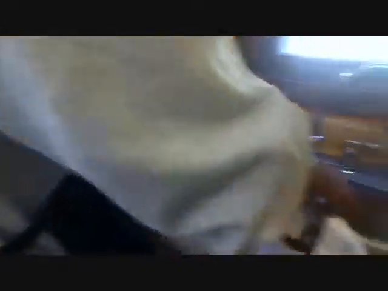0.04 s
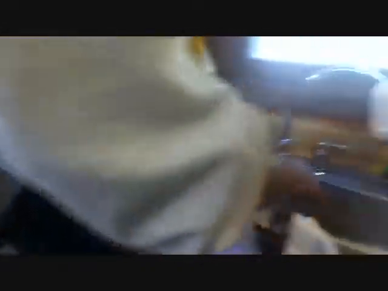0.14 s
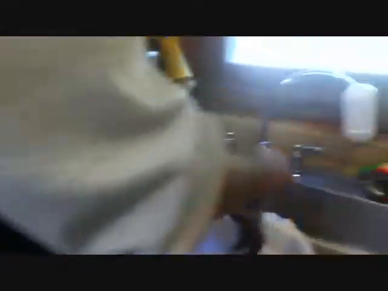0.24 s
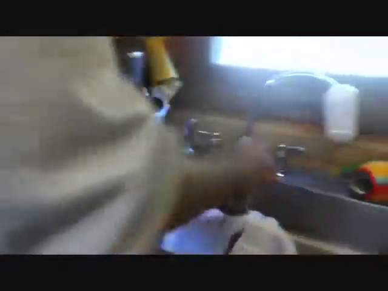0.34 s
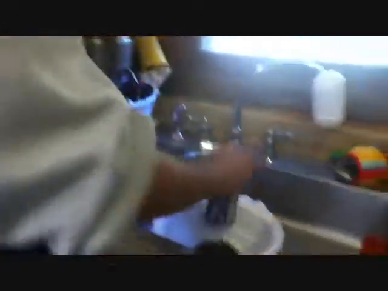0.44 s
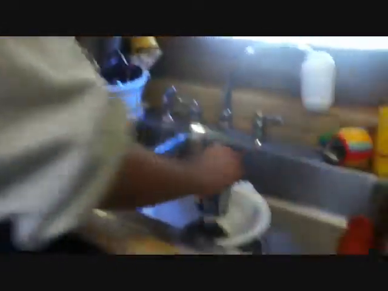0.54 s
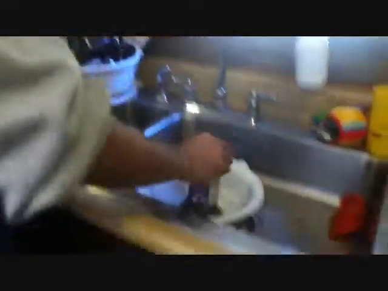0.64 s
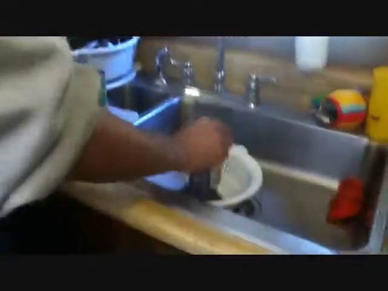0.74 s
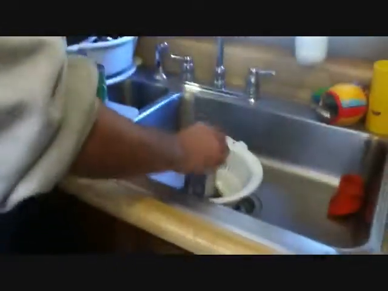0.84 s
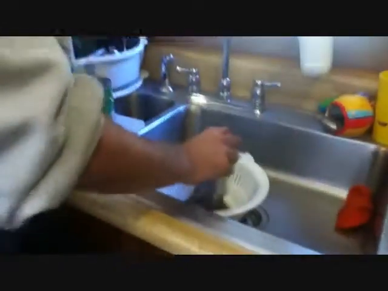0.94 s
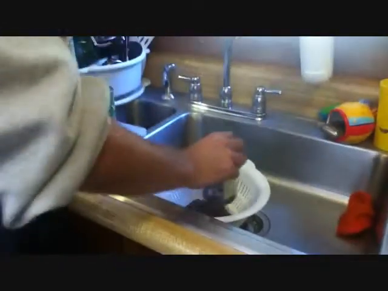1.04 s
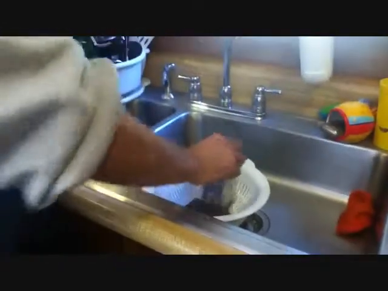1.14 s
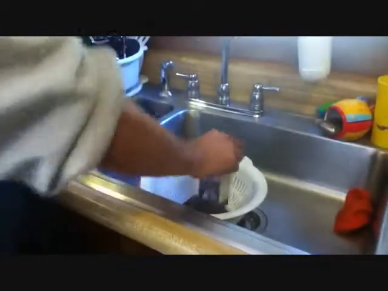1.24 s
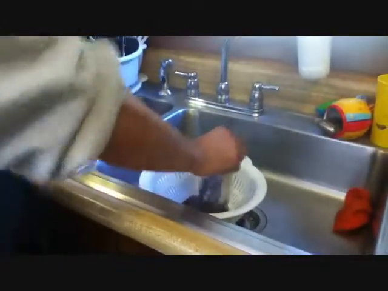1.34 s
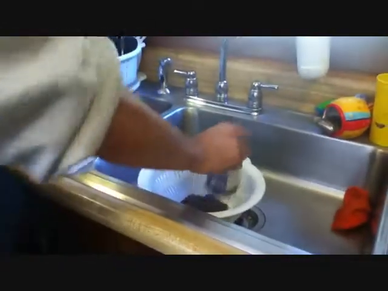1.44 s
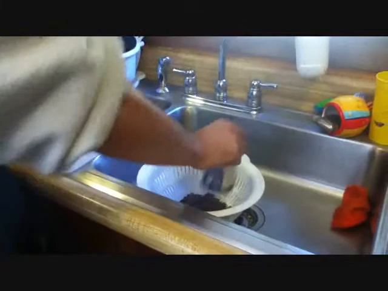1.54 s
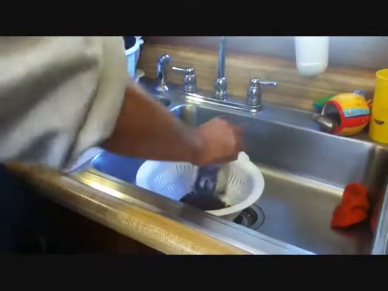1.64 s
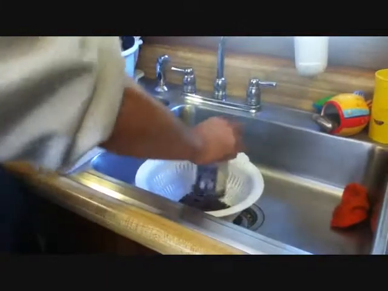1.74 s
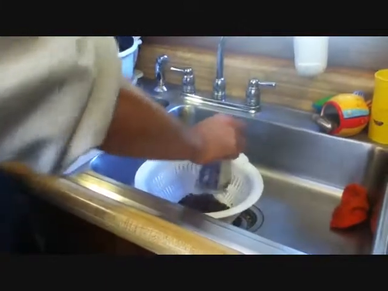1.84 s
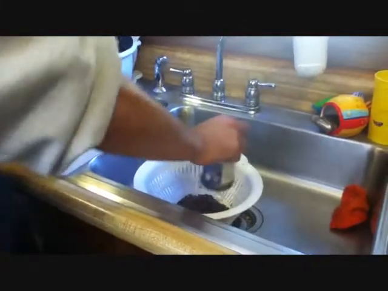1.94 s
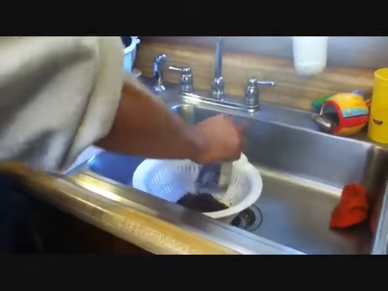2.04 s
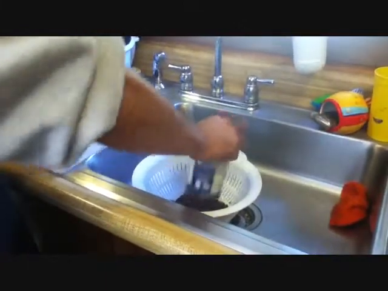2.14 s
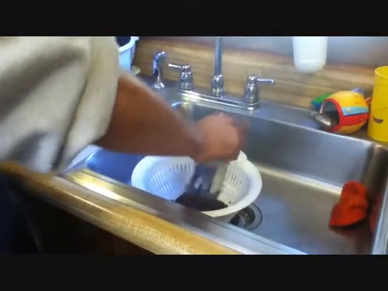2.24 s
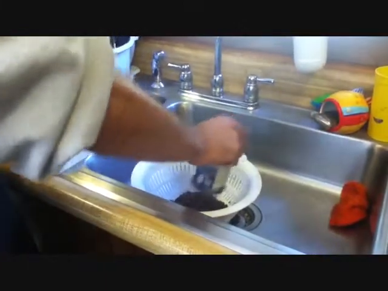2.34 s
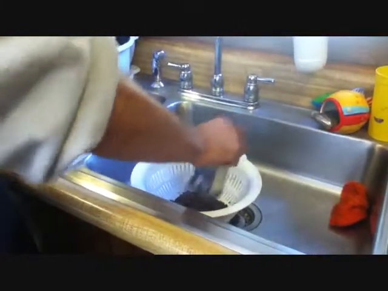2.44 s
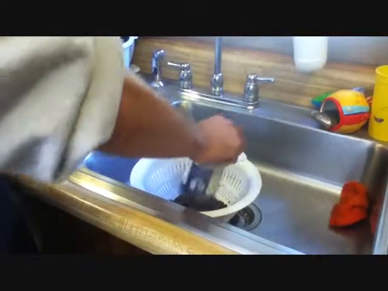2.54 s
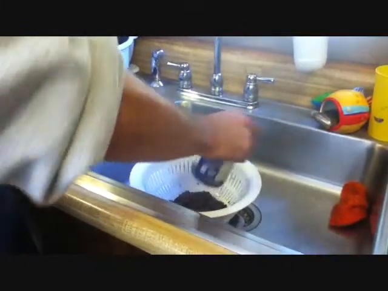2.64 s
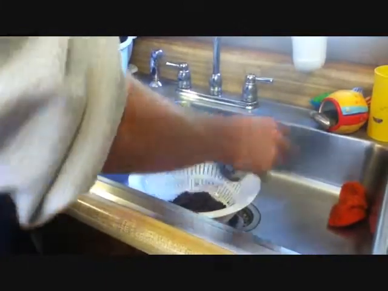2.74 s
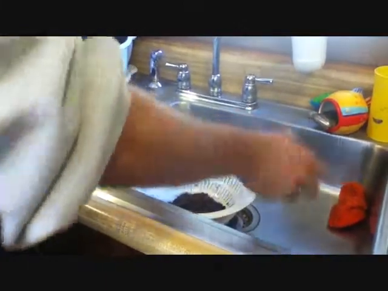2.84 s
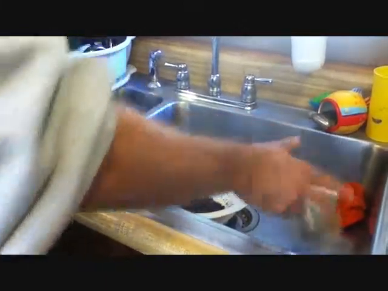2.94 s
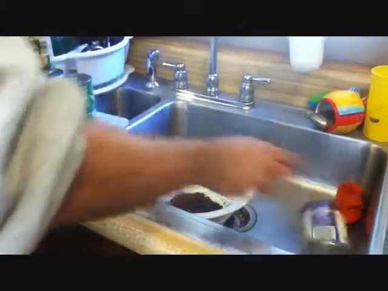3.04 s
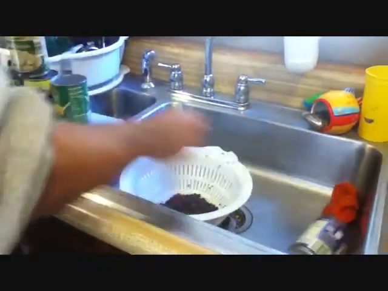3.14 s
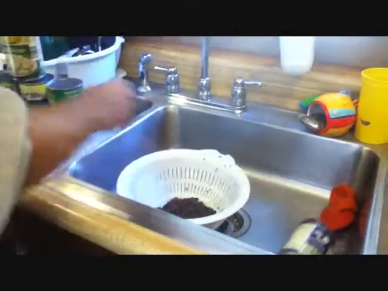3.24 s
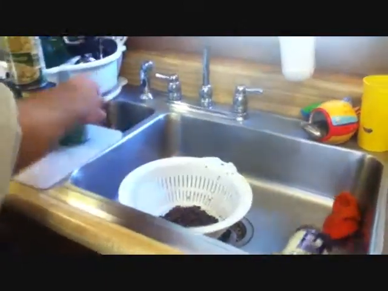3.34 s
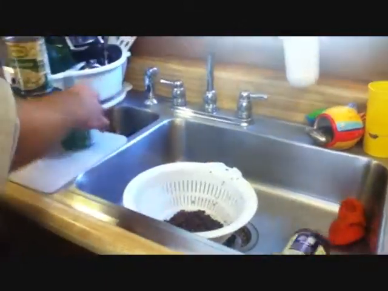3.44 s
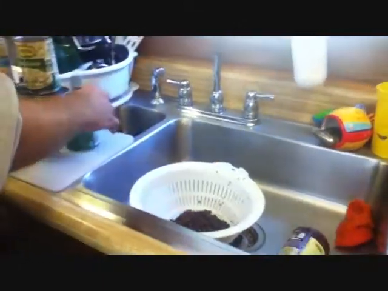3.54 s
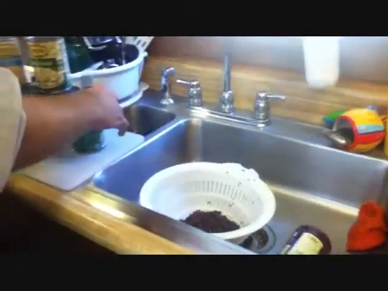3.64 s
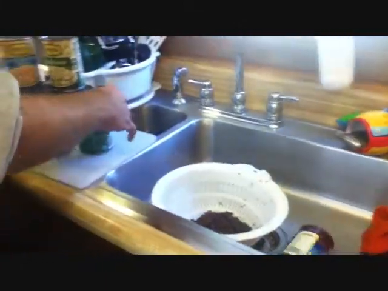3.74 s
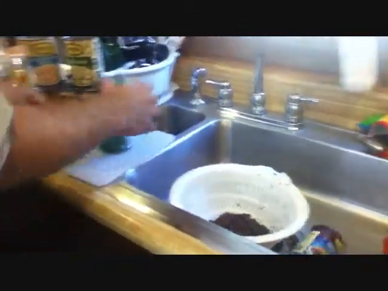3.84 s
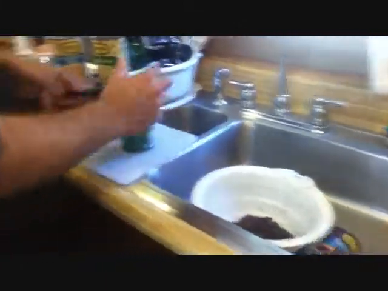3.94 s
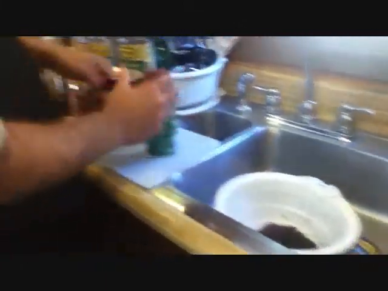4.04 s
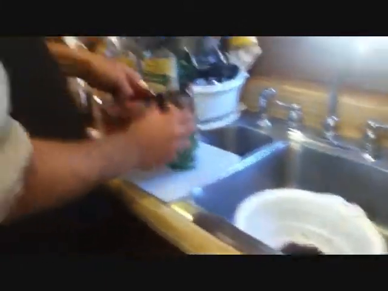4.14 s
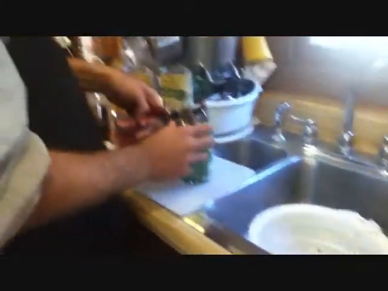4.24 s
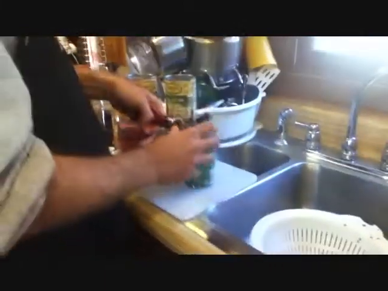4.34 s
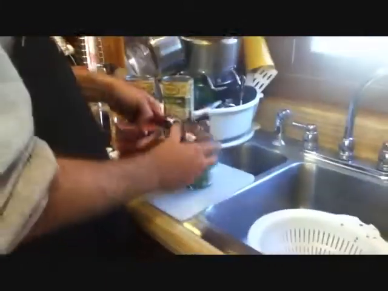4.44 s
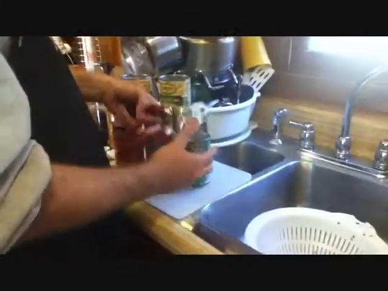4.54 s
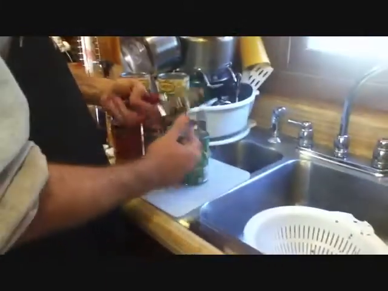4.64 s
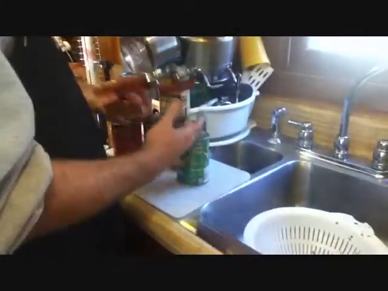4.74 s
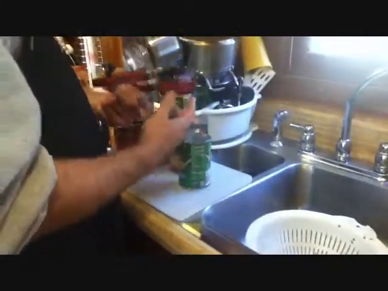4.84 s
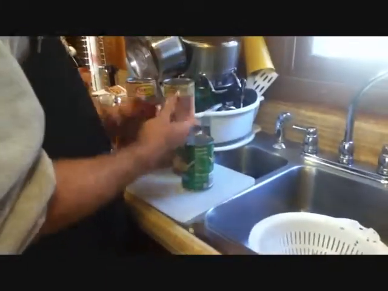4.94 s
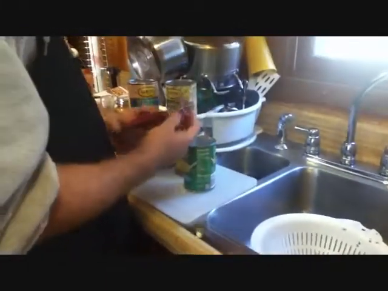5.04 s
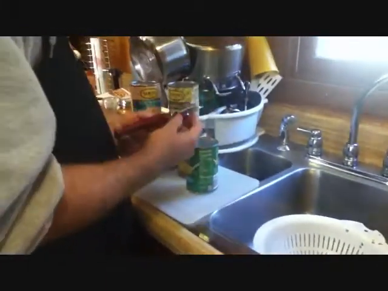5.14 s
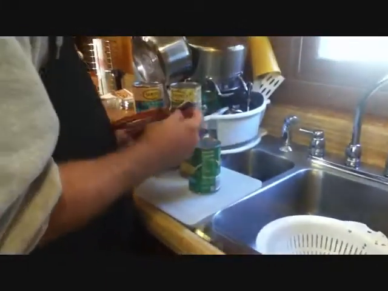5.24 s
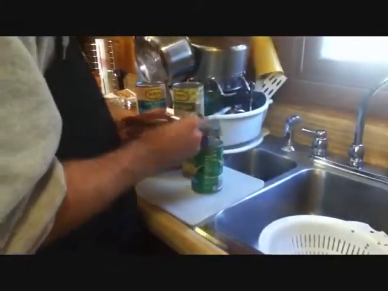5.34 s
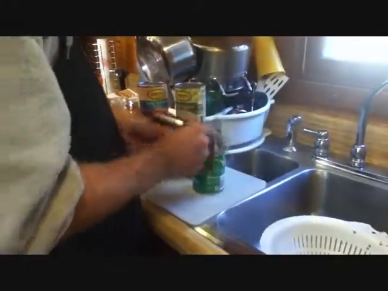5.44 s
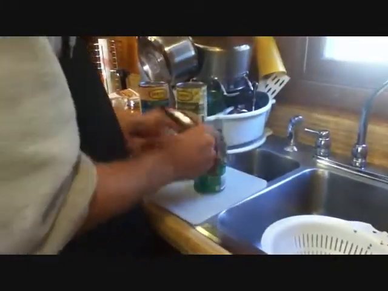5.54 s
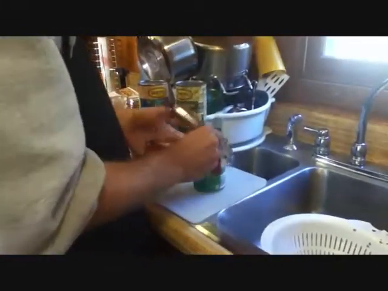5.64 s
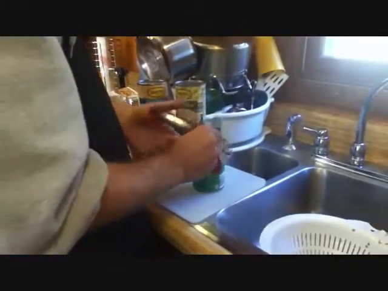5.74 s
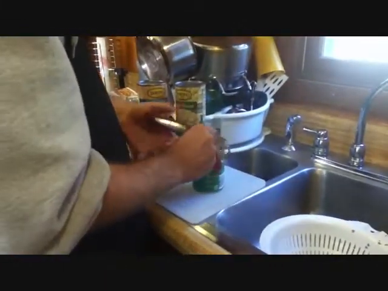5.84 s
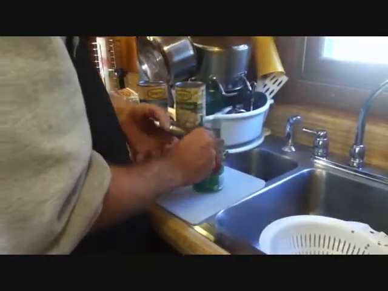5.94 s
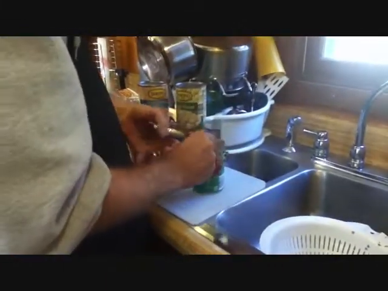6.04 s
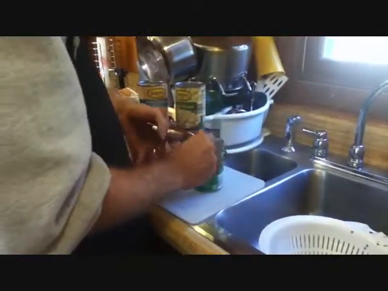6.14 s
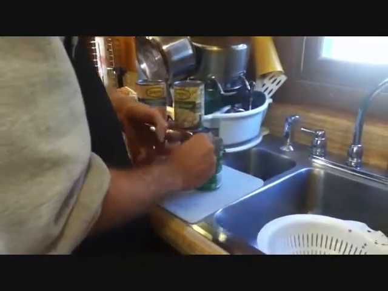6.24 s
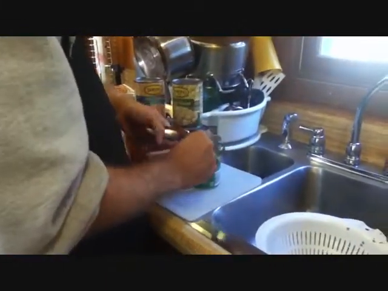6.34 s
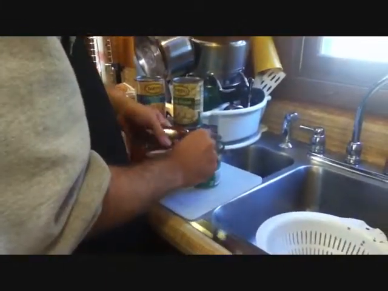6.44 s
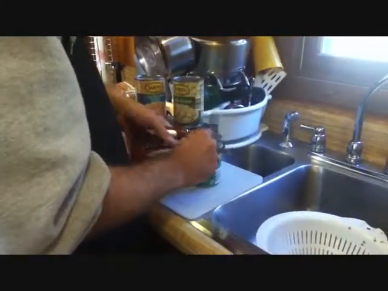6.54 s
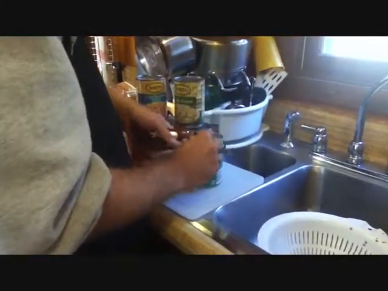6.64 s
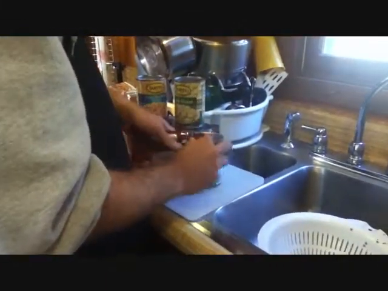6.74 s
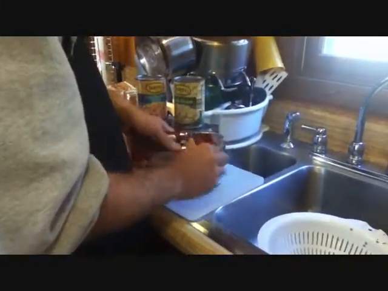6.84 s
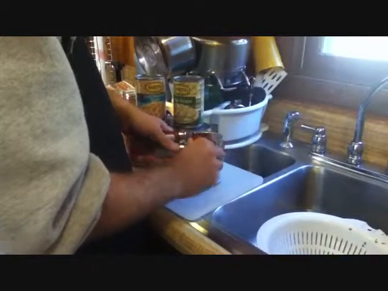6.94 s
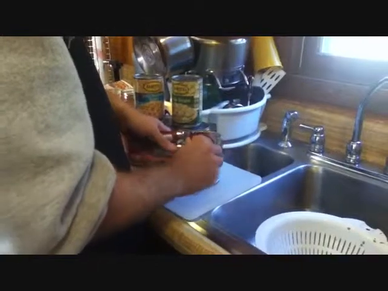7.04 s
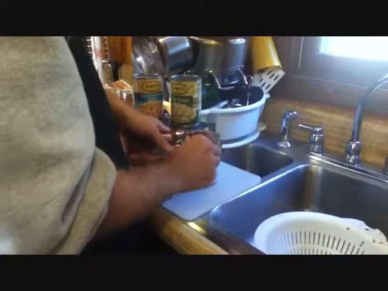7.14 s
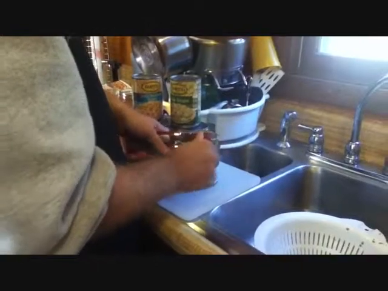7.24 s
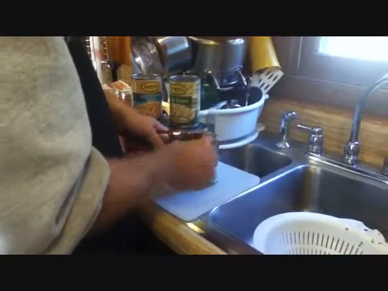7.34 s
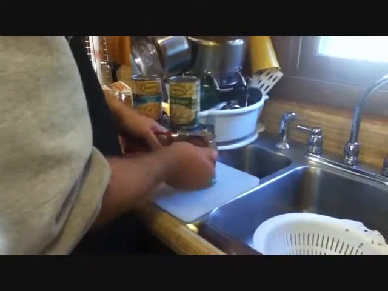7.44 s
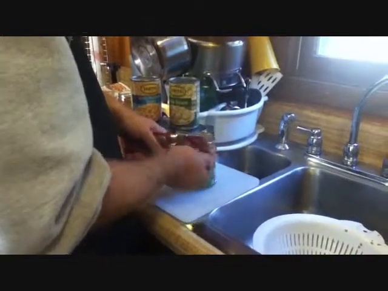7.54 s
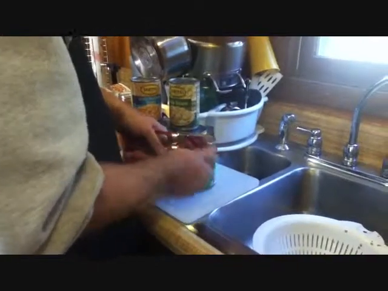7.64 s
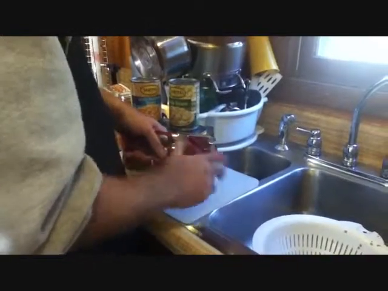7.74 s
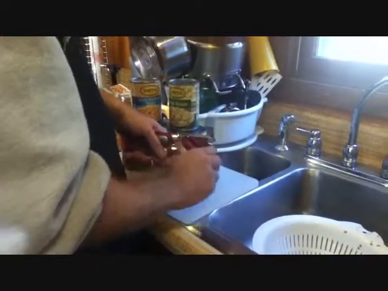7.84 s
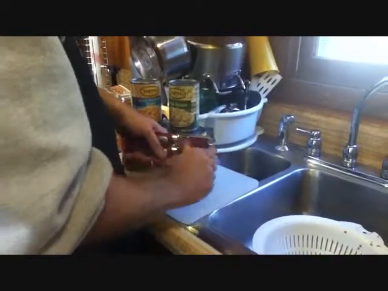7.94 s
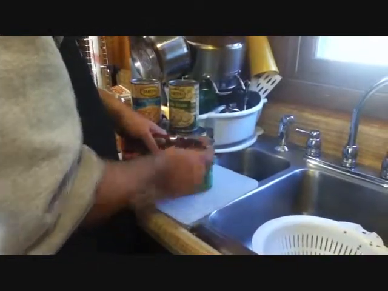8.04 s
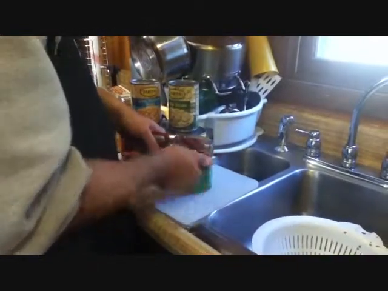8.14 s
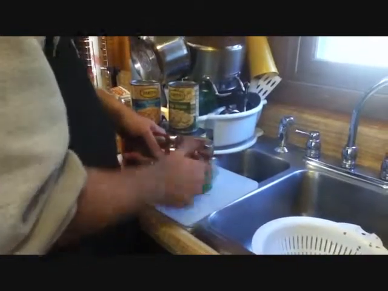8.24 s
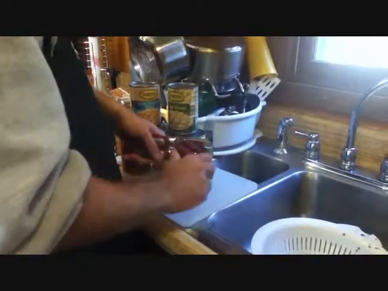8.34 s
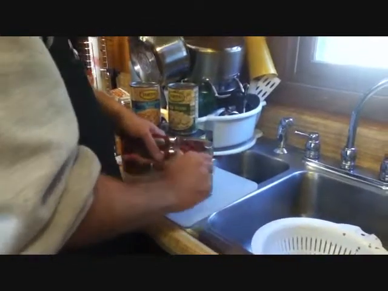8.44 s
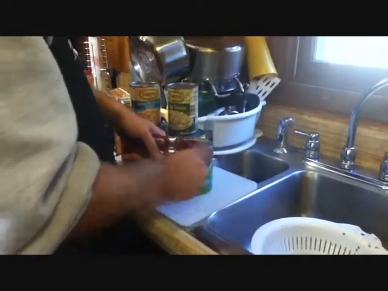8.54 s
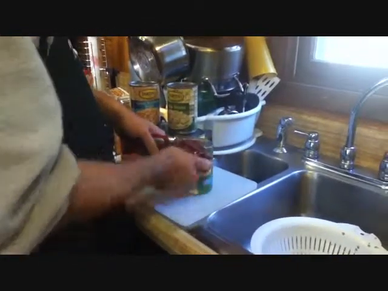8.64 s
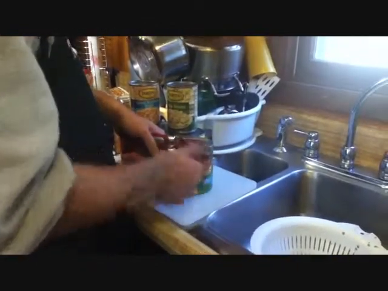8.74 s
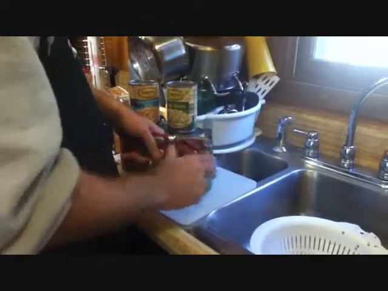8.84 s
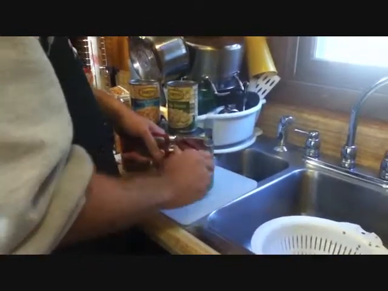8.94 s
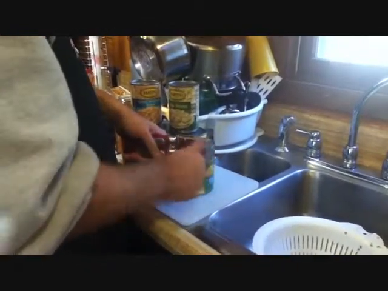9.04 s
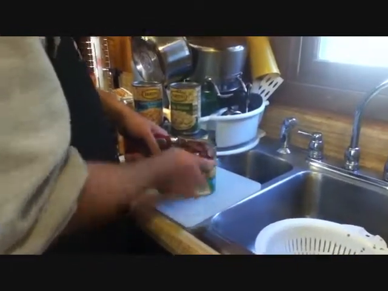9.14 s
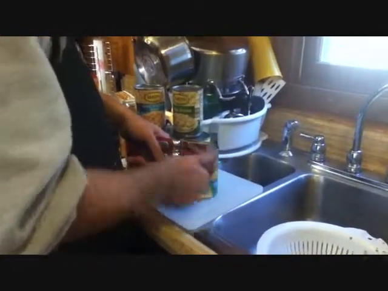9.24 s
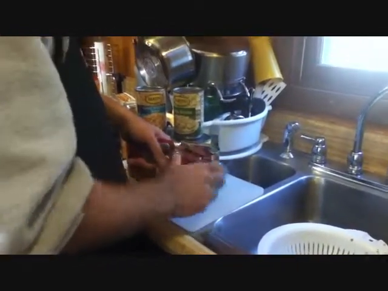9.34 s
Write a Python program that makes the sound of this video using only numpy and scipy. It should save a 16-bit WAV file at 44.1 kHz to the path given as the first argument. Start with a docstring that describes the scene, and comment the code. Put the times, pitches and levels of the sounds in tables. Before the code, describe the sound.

Close mono sound with light hiss and short room echo. First tinny jolts and squelchy drips of beans, thinning out; then a very loud double clatter of an empty can in a metal basin. A heavy can drags briefly and thuds on a board. After small metal ticks, opener jaws snap sharply, the lid crunches, and several cranks squeak and tear while the can rocks.

```python
"""A hand opener snaps onto a full can, breaks through the lid and is cranked in short squeaking turns.
Before that, an open can is shaken out into a colander and dropped, empty, into a steel sink.
The full can is then slid over a cutting board, where it later thumps and rocks.
Blows are short noise bursts plus ringing sine waves; sliding and cutting are tiny jerks sent through
resonances. There is a small hard room, faint hiss, rustling sleeves, and gain that dips after loud blows."""
import sys
import numpy as np
from scipy import signal
from scipy.io import wavfile
from scipy.ndimage import uniform_filter1d

SR = 44100
rng = np.random.default_rng(int(sys.argv[2]) if len(sys.argv) > 2 else 0)


def dump(signal):
    """Clip the signal to [-1, 1] and save it as 16-bit WAV at the path in sys.argv[1]."""
    limited = np.clip(np.atleast_2d(signal).T, -1, 1)
    pcm = np.round(limited * 32767).astype(np.int16)
    wavfile.write(sys.argv[1], SR, pcm)


N = 413658
TIME = np.arange(N) / SR   # seconds
BANDS_HZ = 31.25 * 2 ** (np.arange(28) / 3)   # centres of the third-octave bands
CUTOFF_HZ = 16000

# In every table, t60 is the time in seconds to die away by 60 dB.
# In every colour table, each row: frequency in Hz, level in dB per third octave.

# Steady hiss, as a colour table.
HISS_COLOUR = [(25, -90), (50, -78), (100, -69), (135, -67), (200, -72.5), (500, -73.5), (1000, -69.5),
               (2200, -73), (3200, -67), (4000, -63), (5000, -60.5), (6300, -66), (8000, -66.5),
               (10000, -66), (13000, -74), (16000, -72)]
# Rustling sleeves, as a colour table; only the shape counts.
RUSTLE_COLOUR = [(50, -24.5), (130, 5), (300, 8.5), (700, 3.5), (1400, -1.5), (4000, -19.5), (16000, -31.5)]
# Arm movements that rustle the sleeves. Each row: start in seconds, length in seconds, level in dB.
ARM_MOVES = [(-.2, 0.2, -38.5), (.3, 1.48, -56), (3.6, 0.56, -50.5), (6.15, 0.69, -58.5), (7.35, 0.11, -64),
             (8.25, 0.16, -57.5), (9.15, .23, -43)]
MOVE_ATTACK_S, MOVE_T60_S, STILL_DB = 0.12, 1.84, -63
# How long the kitchen echoes last. Each row: frequency in Hz, t60 in seconds.
KITCHEN_ECHO = [(100, .5), (500, 0.45), (2000, 0.35), (6000, 0.26), (15000, 0.26)]

# Light metal ticks as can and opener are handled.
# Each row: start in seconds, level in dB, centre in Hz, t60 in seconds for sound near 3000 Hz.
TICKS = [(0.302, -43.5, 7100, 0.039), (0.478, -41, 5900, 0.11), (0.519, -39, 7800, 0.1),
         (0.6, -40, 9200, 0.055), (1.131, -40, 5000, 0.049), (1.86, -40, 9000, 0.045),
         (3.679, -25, 2080, 0.063), (3.714, -32.5, 6500, 0.14), (3.782, -34, 6140, 0.071),
         (4.203, -31.5, 5740, 0.066), (5.025, -42.5, 4170, 0.04), (5.48, -20, 5400, 0.012),
         (5.728, -39, 4450, 0.025), (8.266, -30.5, 5030, 0.035), (9.278, -29.5, 6660, 0.048)]
# Metal scuffs faintly in the hands. Each row: start in seconds, length in seconds, level in dB.
SCUFFS = [(2.99, 0.046, -52.5), (5.05, 0.27, -57), (5.47, 0.034, -50.5), (6.87, 0.022, -49.5)]
SCUFF_HZ, SCUFF_ATTACK_S, SCUFF_T60_S = 6400, .02, .15

# The open can is jolted over the colander. Each row: start in seconds, rattle level in dB,
# rattle t60 in seconds for sound near 3000 Hz, ring level in dB.
JOLTS = [(0.002, -40, 0.53, -37.5), (0.054, -25, 0.19, -34), (0.112, -38, 0.25, -42),
         (0.150, -41.5, 0.29, -65), (0.193, -43.5, 0.082, -47), (0.403, -25, 0.081, -64),
         (0.413, -20.5, 0.045, -40)]
# Ringing wall of the open can. Each row: frequency in Hz, level in dB, t60 in seconds.
OPEN_CAN_MODES = [(243.8, -2, 1), (334, -21, 1), (387, -2, 1), (477, -8, 0.43), (626, -3.5, 0.18),
                  (863, -4, 0.28), (970, 1.5, 0.19), (1072, -1.5, 0.19), (1538, -8, 0.11),
                  (1776, -2.5, 0.13), (2214, -6, 0.12), (2930, -13, .25), (3515, -12, 0.38),
                  (3714, -24, .23), (4420, -29, 0.17), (5040, -18, 0.3), (5500, -26, 0.25), (5642, -31, .3),
                  (7030, -25, 0.18), (8366, -14, 0.33), (8800, -21, .22), (10700, -18, 0.27)]
# Rattle of the open can, as a colour table; only the shape counts.
RATTLE_COLOUR = [(40, -43), (100, -40), (300, -7.5), (900, -5.5), (1700, -6), (4000, 2.5), (8500, 4),
                 (12000, -5), (16000, -28)]
# The biggest clumps of beans land with a squelch. Each row: start in seconds, level in dB, centre in Hz.
PLOPS = [(0.421, -29, 740), (0.433, -27.5, 660), (0.560, -40, 1580), (0.657, -37.5, 920),
         (0.876, -39.5, 2230), (0.884, -38, 990), (0.960, -40.5, 1150), (1.079, -31.5, 1250),
         (1.263, -45.5, 1090), (1.545, -44.5, 910), (1.681, -38.5, 726), (1.710, -37.5, 1100),
         (2.129, -43, 970)]
# Between the clumps single beans dribble out, softer and lower as they go.
DRIBBLE_START_S, DRIBBLE_GAP_S = 0.8, .115
DRIBBLE_DB, DRIBBLE_FADE_DB_PER_S = -44.5, 2.5
DRIBBLE_HZ, DRIBBLE_SAG_OCTAVES_PER_S = 980, 0.41

# The basin is struck. Each row: start in seconds, clatter level in dB,
# clatter t60 in seconds for sound near 3000 Hz, ring level in dB.
CRASHES = [(0.420, -70, .2, -48), (3.1721, -4, 0.13, -33), (3.179, -3, 0.089, -17),
           (3.187, -7.5, 0.061, -49), (3.327, -6, 0.11, -26.5), (3.378, -21, 0.25, -54),
           (3.428, -47, 0.09, -44)]
# Ringing steel basin. Each row: frequency in Hz, level in dB, t60 in seconds.
BASIN_MODES = [(163.6, -0.5, 0.39), (238, -1, 0.43), (315.4, -3, 0.35), (346, -7.5, 0.55), (459, -1, 0.8),
               (490, -9, 0.35), (615, -9.5, 0.34), (669, -3, .3), (776.8, 2.5, 0.43), (945, -4, .15),
               (1032, -1.5, 0.39), (1126, 0, .2), (1299, -6.5, .18), (1374, -8.5, .2), (1680, -16.5, .2),
               (1860, -5.5, .2), (2850, -18, 0.22)]
# Clatter in the basin, as a colour table; only the shape counts.
CLATTER_COLOUR = [(30, -41), (55, -37), (90, -32.5), (160, -14.5), (300, -2.5), (550, -3.5), (1100, 0.5),
                  (2100, -2), (4000, 2), (8000, 2.5), (11000, -4), (16000, -23)]

# The full can is pushed over the board. Each row: start in seconds, length in seconds, level in dB.
PUSHES = [(3.628, 0.095, -28), (3.83, 0.029, -39)]
PUSH_ATTACK_S, PUSH_T60_S = 0.024, 0.29
# Resonances of the sliding can. Each row: frequency in Hz, width in Hz, level in dB.
SLIDE_BODY = [(237, 17, 6), (308, 21, -2), (443, 46, -12), (802, 25, -2), (894, 84, -11.5),
              (1400, 320, -14.5), (2080, 420, -20), (4530, 3600, -28.5)]
# Can and board ringing together. Each row: frequency in Hz, level in dB, t60 in seconds.
BOARD_MODES = [(150, -17, 0.14), (239.4, 1.5, 0.15), (311.6, -7, 0.21), (366.8, -13.5, 0.18),
               (438, -18, 0.096), (532, -27.5, 0.14)]
# The full can tips back on the board.
# Each row: start in seconds, level in dB, contact time in seconds, brightness in dB per octave.
ROCKS = [(3.723, -20, 0.016, 11), (3.775, -25, 0.009, 0), (4.201, -43, 0.0056, 15.5),
         (6.815, -40, 0.0054, -4), (7.518, -28.5, 0.0088, -7), (7.613, -33.5, 0.0061, -4),
         (7.817, -39, 0.0061, -14), (8.271, -17, 0.0018, 5.5), (8.651, -28, 0.011, -10),
         (8.709, -26.5, 0.0053, -2), (8.835, -33, 0.0044, -10), (9.086, -40, .008, -16),
         (9.296, -13.5, 0.0087, -6.5)]
THUMP_CONTACT_S = 0.0057
# A contact shorter than HARD_CONTACT_S rebounds twice, each time weaker and brighter (dB per octave).
HARD_CONTACT_S, REBOUND_S, REBOUND_LOSS_DB, REBOUND_BRIGHTER_DB = .0039, .056, 9, 5.5

# Turns of the crank. Each row: start in seconds, length in seconds, cutting level in dB.
TURNS = [(7.49, 0.19, -47), (8.122, 0.12, -33.5), (8.642, 0.12, -37), (9.14, 0.14, -36.5)]
TURN_ATTACK_S, TURN_T60_S = 0.038, 0.26
# The lid gives way in a surge. Each row: time of the peak in seconds, level in dB.
TEARS = [(7.527, -37), (8.228, -45), (8.74, -24), (9.199, -35.5), (9.288, -33.5)]
TEAR_WIDTH_S = 0.022
# The lid under the cutting wheel. Each row: frequency in Hz, width in Hz, level in dB.
CUT_BODY = [(233, 37, 7.5), (429, 78, 2.5), (765, 80, -1), (936, 123, -3), (1080, 167, -0.5),
            (1810, 440, -7.5), (2070, 170, -4.5), (2480, 460, -13.5), (3680, 570, -11.5), (5140, 1430, -17),
            (7540, 2600, -20)]
# The wheel squeaks. Each row: start in seconds, length in seconds, average pitch in Hz, level in dB.
SQUEAKS = [(5.135, .09, 3150, -58), (5.238, 0.1, 3290, -57.5), (7.62, 0.054, 1090, -44),
           (8.104, 0.12, 1129, -33), (8.2, 0.059, 2080, -38), (8.238, 0.043, 3700, -39),
           (8.72, 0.077, 1232, -32.5), (8.764, 0.12, 1240, -46), (9.146, 0.09, 1124, -33)]

# The opener bites on the rim and presses the can on the board. Each row: start in seconds,
# then levels in dB of the steel snap, lid crunch, lid ring, opener frame ring and board thump.
BITES = [(5.126, -36.5, -62, -72, -59, -73), (6.053, -37.5, -30, -45.5, -44.5, -31.5),
         (6.133, -15.5, -29, -25, -29.5, -23), (6.333, -49.5, -44.5, -48.5, -66, -39),
         (6.539, -51, -48, -44, -67.5, -52), (6.694, -52, -47, -48.5, -73, -35),
         (7.119, -15.5, -8.5, -13, -44, -32), (7.3867, -18, -20, -51, -48, -16.5)]
# Steel snap, as a colour table; only the shape counts.
SNAP_COLOUR = [(60, -29), (250, -8.5), (900, -12), (2300, -6), (5500, 5), (8500, 4), (12000, -5),
               (16000, -19)]
# Lid crunch, as a colour table; only the shape counts.
CRUNCH_COLOUR = [(40, -45), (200, -21), (450, -4), (900, -1.5), (1400, -3.5), (1900, 5), (2600, -1.5),
                 (4000, 2), (8000, -52), (16000, -36)]
# Ringing lid and wall of the full can. Each row: frequency in Hz, level in dB, t60 in seconds.
LID_MODES = [(446, -7.5, 0.18), (730, -12, 0.16), (833, 3, 0.1), (993, -8.5, 0.074), (1069, -0.5, 0.12),
             (1306, -22, 0.085), (1716, -22, 0.081), (1754, -6, 0.075), (2390, -19, 0.085)]
# Ringing steel frame of the opener. Each row: frequency in Hz, level in dB, t60 in seconds.
FRAME_MODES = [(1862, 6, 0.08), (2000, -11, 0.037), (3230, -25, 0.068), (4240, -14.5, .1), (5680, -1, 0.12),
               (7170, -15, .14), (7900, -7, 0.18), (8900, -11, .08)]
SECOND_JAW_S, SECOND_JAW_DB = .007, -7   # the other jaw closes just after the first


def from_db(db):
    """Turn decibels into gain."""
    return 10 ** (np.asarray(db) / 20)


def rms_one(x):
    """Scale a sound to an rms (average strength) of 1."""
    return x / np.sqrt(np.mean(x ** 2) + 1e-20)


def fade(t, t60):
    """Die away freely, by 60 dB in t60 seconds."""
    return np.exp(-np.log(1000) * t / t60)


def per_band(points):
    """Read off a table of (Hz, value) at the band centres."""
    hz, value = np.transpose(points)
    return np.interp(np.log(BANDS_HZ), np.log(hz), value)


def noise_bank():
    """Make third-octave bands of noise, each with rms 1."""
    white = rng.standard_normal((2, N))   # neighbouring bands take turns between two noises
    half_band = 2 ** (1 / 6)
    bands = []
    for k, hz in enumerate(BANDS_HZ):
        band_filter = signal.butter(2, [hz / half_band, hz * half_band], "band", fs=SR, output="sos")
        bands.append(rms_one(signal.sosfilt(band_filter, white[k % 2])))
    return np.array(bands)


def shares(colour_db):
    """Turn a colour into band gains whose powers add up to one."""
    gain = from_db(colour_db)
    return gain / np.sqrt(np.sum(gain ** 2))


def hump(hz, skirt_db):
    """Colour of one broad resonance, down by skirt_db an octave away."""
    return -skirt_db * np.log2(1 + np.log2(BANDS_HZ / hz) ** 2)


def add(out, s, sound):
    """Mix a sound in at time s."""
    start = max(round(s * SR), 0)
    out[start:start + len(sound)] += sound[:N - start]


def drift(rate, size):
    """Wander smoothly between random values, rate of them per second, with a spread near 1."""
    knots = rng.standard_normal(4000)
    return np.interp(TIME[:size] * rate, np.arange(len(knots)), knots)


def burst(bank, colour_db, t60, lows_linger, rise=0.00045):
    """A blow on countless close resonances: bands of noise that die away, the low ones last."""
    t = TIME[:SR // 4]
    start = rng.integers(N - SR)
    decay = fade(t, t60 * (BANDS_HZ[:, None] / 3000) ** -lows_linger)
    noise = shares(colour_db) @ (bank[:, start:start + len(t)] * decay)
    return noise * (1 - np.exp(-t / rise))


def mode_waves(modes):
    """Each mode (way of ringing) is one decaying sine; the signs alternate."""
    t = TIME[:SR // 2]
    waves = []
    for k, (hz, db, t60) in enumerate(modes):
        waves.append((-1) ** k * from_db(db) * np.sin(2 * np.pi * hz * t) * fade(t, t60))
    return np.array(waves)


def ring(waves, scatter_db, contact=0.00055, emphasis_db=0):
    """A blow rings each mode with its own random strength; a soft contact swells in without a click."""
    strength = from_db(emphasis_db + scatter_db * rng.standard_normal(len(waves)))
    sound = strength @ waves
    return sound * np.tanh(TIME[:len(sound)] / contact) ** 2


def resonate(x, body):
    """Pass a sound through side-by-side resonances of alternating sign."""
    out = 0
    for k, (hz, width, db) in enumerate(body):
        r = np.exp(-np.pi * width / SR)
        feedback = [1, -2 * r * np.cos(2 * np.pi * hz / SR), r * r]
        gain = (-1) ** k * from_db(db) * (1 - r * r) / 2
        out = out + gain * signal.lfilter([1, 0, -1], feedback, x)
    return out


def slips(per_s, spread_db):
    """Stick and slip: tiny jerks of uneven size at random moments."""
    sizes = from_db(spread_db * np.minimum(rng.exponential(1, N), 3)) * rng.choice([-1, 1], N)
    happens = rng.random(N) < per_s / SR
    return sizes * happens + 1e-18


def stroke(s, length, attack_s, t60):
    """Effort of one hand movement: it builds up, holds until its length is over, then dies away."""
    t = TIME - s
    return np.clip(t / attack_s, 0, 1) * fade(np.maximum(t - length, 0), t60)


def strokes(rows, attack_s, t60):
    """Add up the efforts of a table of movements."""
    return sum(from_db(db) * stroke(s, length, attack_s, t60) for s, length, db in rows)


def background(bank):
    """Steady hiss, and a low rustle of sleeves that follows the arms."""
    hiss = from_db(per_band(HISS_COLOUR)) @ bank
    rustle = (shares(per_band(RUSTLE_COLOUR)) @ bank)[::-1]   # reversed, so unlike the hiss
    arm_level = np.hypot(from_db(STILL_DB), strokes(ARM_MOVES, MOVE_ATTACK_S, MOVE_T60_S))
    return hiss + arm_level * rustle


def kitchen(x, bank):
    """Blurred echoes build up within a few milliseconds and die sooner in the treble."""
    t = TIME[:SR * 2 // 3]
    echoes = bank[:, :len(t)] * fade(t, per_band(KITCHEN_ECHO)[:, None])
    # wider bands get more power, so that the echoes start out even in colour
    tail = np.sqrt(BANDS_HZ) @ echoes * (1 - np.exp(-(t / 0.0068) ** 2))
    return signal.fftconvolve(x, tail / np.sqrt(np.sum(tail ** 2)))[:N]


def handling(bank):
    """Metal touching metal: small bright noise bursts, and scuffs of longer noise."""
    scuff_noise = np.roll(shares(hump(SCUFF_HZ, skirt_db=6)) @ bank, SR)
    out = strokes(SCUFFS, SCUFF_ATTACK_S, SCUFF_T60_S) * scuff_noise
    for s, db, hz, t60 in TICKS:
        add(out, s, from_db(db) * burst(bank, hump(hz, skirt_db=8.5), t60, lows_linger=0.086))
    return out


def dribble(count):
    """Stray beans at uneven moments, as rows of start in seconds, level in dB, centre in Hz."""
    early, loud, high = rng.standard_normal((count, 3)).T
    t = DRIBBLE_GAP_S * (np.arange(count) + 0.36 * early)
    level_db = DRIBBLE_DB - DRIBBLE_FADE_DB_PER_S * t + 0.57 * loud
    centre_hz = DRIBBLE_HZ * 2 ** (0.18 * high - DRIBBLE_SAG_OCTAVES_PER_S * t)
    return list(zip(DRIBBLE_START_S + t, level_db, centre_hz))


def emptying(bank):
    """The open can rattles and its wall rings; beans land as soft, wavering bursts of noise."""
    out, wall = np.zeros(N), mode_waves(OPEN_CAN_MODES)
    for s, db, t60, ring_db in JOLTS:
        add(out, s, from_db(db) * burst(bank, per_band(RATTLE_COLOUR), t60, lows_linger=0.44))
        add(out, s, from_db(ring_db) * ring(wall, scatter_db=2.5))
    for s, db, hz in PLOPS + dribble(count=11):
        squelch = burst(bank, hump(hz, skirt_db=8.5), t60=0.05, lows_linger=0.41, rise=0.0033)
        wet_flutter = from_db(3.5 * drift(rate=354, size=len(squelch)))
        add(out, s, from_db(db) * squelch * wet_flutter)
    return out


def basin(bank):
    """The empty can lands on the steel sheet, edge after edge, and bounces: clatter and ringing."""
    out, sheet = np.zeros(N), mode_waves(BASIN_MODES)
    for s, db, t60, ring_db in CRASHES:
        clatter = burst(bank, per_band(CLATTER_COLOUR), t60, lows_linger=0.46)
        rim_chatter = from_db(2.0 * drift(rate=700, size=len(clatter)))
        add(out, s, from_db(db) * clatter * rim_chatter)
        add(out, s, from_db(ring_db) * ring(sheet, scatter_db=1.5))
    return out


def board():
    """The heavy can drags by stick and slip, thumps under each bite and tip back, and may rebound."""
    slide = rms_one(resonate(slips(per_s=2200, spread_db=-2.0), SLIDE_BODY))
    out = strokes(PUSHES, PUSH_ATTACK_S, PUSH_T60_S) * slide
    body = mode_waves(BOARD_MODES)
    octaves = np.log2(np.array(BOARD_MODES)[:, 0] / 245)   # each mode's distance from 245 Hz
    for s, *_, thump_db in BITES:
        add(out, s, from_db(thump_db) * ring(body, scatter_db=3.5, contact=THUMP_CONTACT_S))
    for s, db, contact, brightness_db in ROCKS:
        landings = 3 if contact < HARD_CONTACT_S else 1
        for k in range(landings):
            emphasis_db = (brightness_db + k * REBOUND_BRIGHTER_DB) * octaves
            thump = ring(body, scatter_db=2.5, contact=contact, emphasis_db=emphasis_db)
            add(out, s + k * REBOUND_S, from_db(db - k * REBOUND_LOSS_DB) * thump)
    return out


def cutting():
    """Each turn tears the lid in tiny slips that surge as the metal gives; the wheel squeaks unsteadily."""
    surges = sum(from_db(db) * np.exp(-((TIME - s) / TEAR_WIDTH_S) ** 2) for s, db in TEARS)
    unsteady = from_db(1.7 * drift(rate=130, size=N))
    effort = (strokes(TURNS, TURN_ATTACK_S, TURN_T60_S) + surges) * unsteady
    out = effort * rms_one(resonate(slips(per_s=2500, spread_db=3.5), CUT_BODY))
    for s, length, hz, db in SQUEAKS:
        size = int(length * SR)
        pitch_hz = hz * (1 + 0.023 * drift(rate=375, size=size))
        phase = 2 * np.pi * np.cumsum(pitch_hz) / SR
        swell = np.hanning(size) ** 0.76 * from_db(5.3 * drift(rate=184.5, size=size))
        tone = np.sin(phase) + from_db(-13.5) * np.sin(2 * phase)   # with a weak octave above
        add(out, s, from_db(db) * swell * tone)
    return out


def opener(bank):
    """Jaws snap on the rim one after the other, the lid crunches, and lid and opener frame ring."""
    out, lid, frame = np.zeros(N), mode_waves(LID_MODES), mode_waves(FRAME_MODES)
    for s, snap_db, crunch_db, ring_db, frame_db, _ in BITES:
        for delay, jaw_db in ((0, 0), (SECOND_JAW_S, SECOND_JAW_DB)):
            snap = burst(bank, per_band(SNAP_COLOUR), t60=0.06, lows_linger=0.029)
            crunch = burst(bank, per_band(CRUNCH_COLOUR), t60=0.057, lows_linger=0.46)
            add(out, s + delay, from_db(snap_db + jaw_db) * snap)
            add(out, s + delay, from_db(crunch_db + jaw_db) * crunch)
        add(out, s, from_db(ring_db) * ring(lid, scatter_db=2.5))
        add(out, s, from_db(frame_db) * ring(frame, scatter_db=4.5))
    return out


def scene():
    """Sounds down in the sink reach the microphone with more room than those on the counter."""
    bank = noise_bank()
    sink = emptying(bank) + basin(bank)
    counter = handling(bank) + board() + cutting() + opener(bank)
    room = kitchen(from_db(-11) * sink + from_db(-12.5) * counter, bank)
    return (background(bank) + room + sink + counter)[None]   # one channel


def gain_control(x, threshold_db, release_db_per_s):
    """Loud blows push the gain down at once; it creeps back."""
    level_db = 10 * np.log10(np.maximum(uniform_filter1d(x ** 2, size=700), 1e-12))
    recovery = release_db_per_s * TIME
    excess_db = np.maximum(level_db - threshold_db, 0)
    # the deepest cut so far, less what has been recovered since
    cut_db = np.maximum.accumulate(excess_db + recovery, axis=-1) - recovery
    return x * from_db(-cut_db)


def record(dry):
    """Control the gain, round off the peaks and cut off the top of the treble."""
    held = np.tanh(gain_control(dry, threshold_db=-8.5, release_db_per_s=1.5))
    return signal.sosfilt(signal.ellip(10, .1, 80, CUTOFF_HZ, fs=SR, output="sos"), held)


dry = scene()
out = record(dry)
dump(out)
```